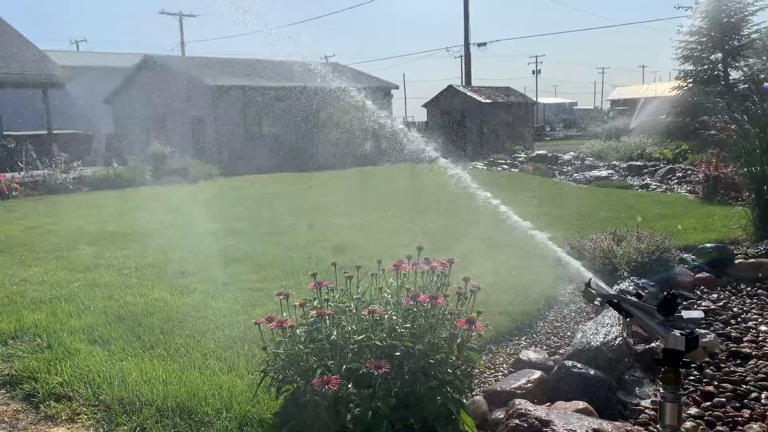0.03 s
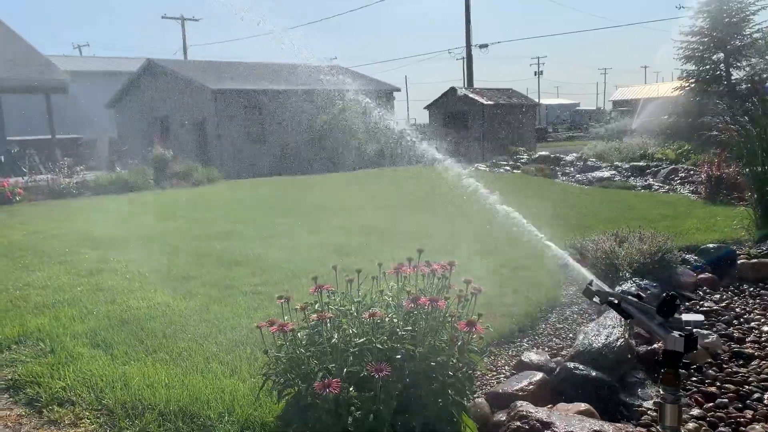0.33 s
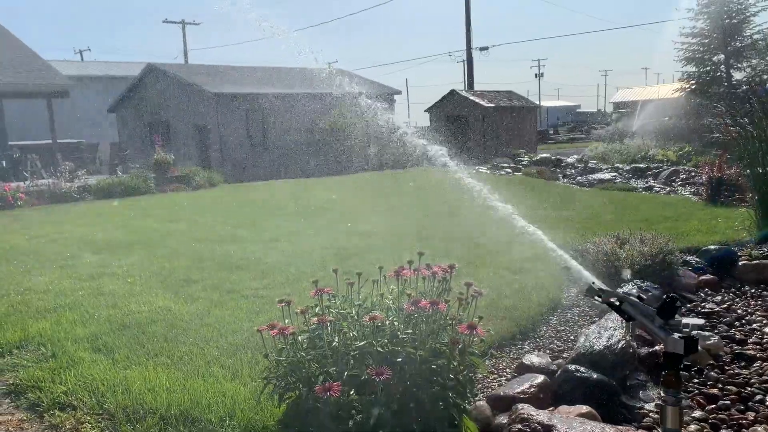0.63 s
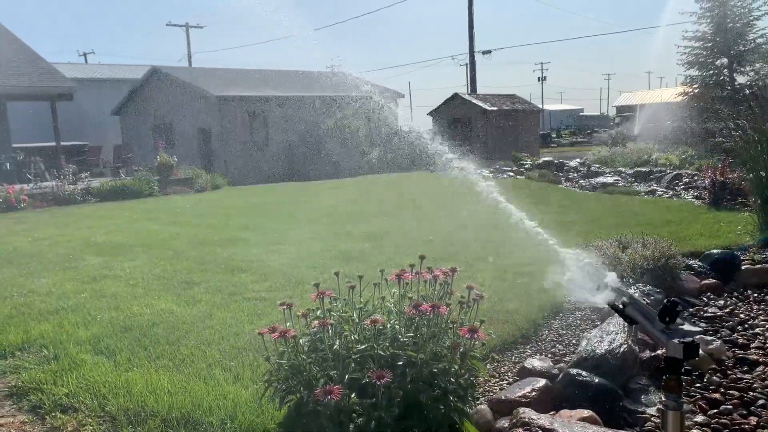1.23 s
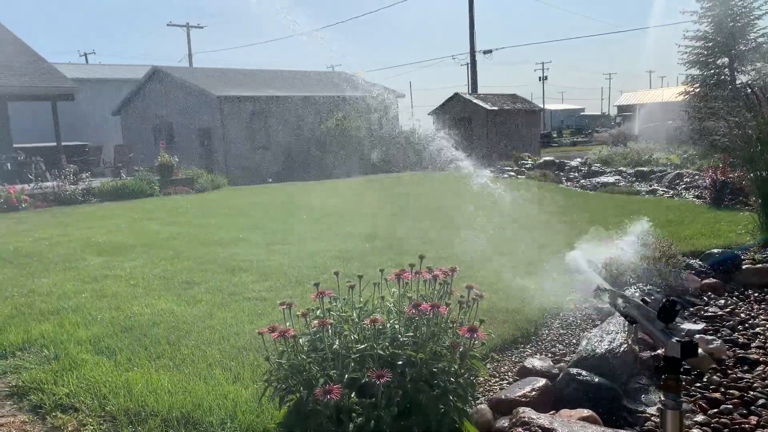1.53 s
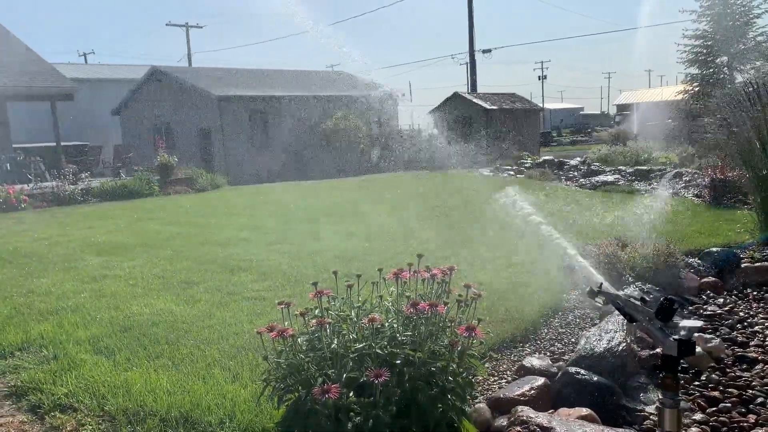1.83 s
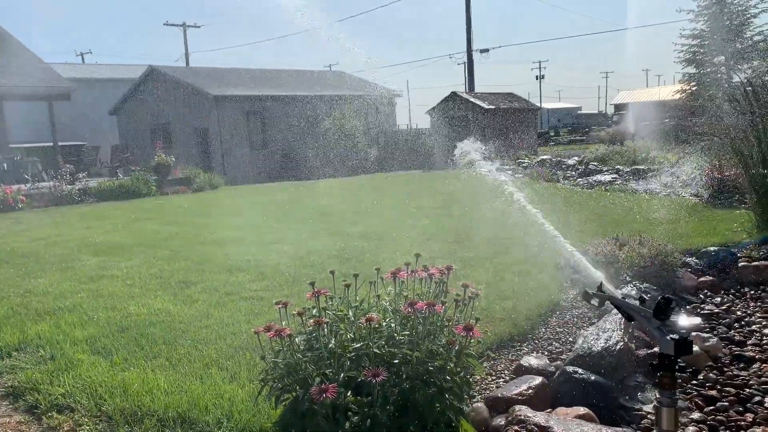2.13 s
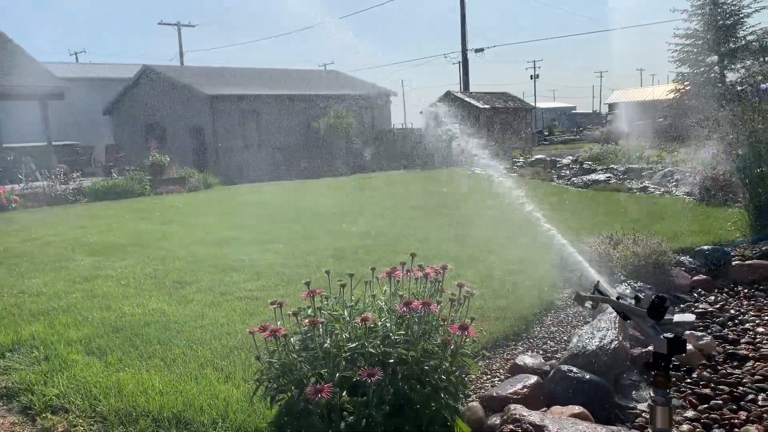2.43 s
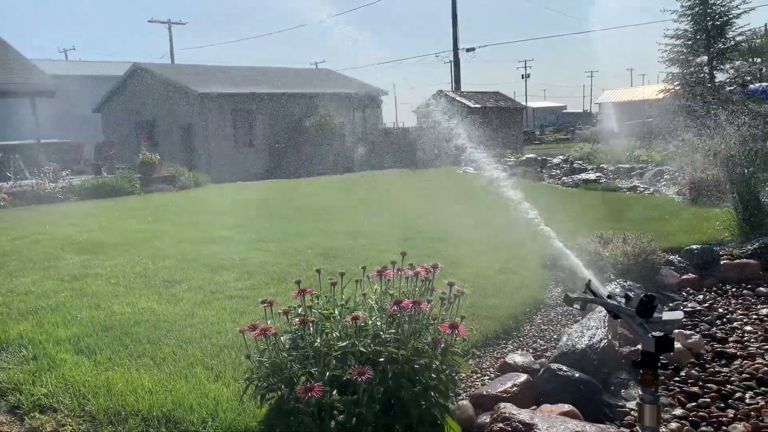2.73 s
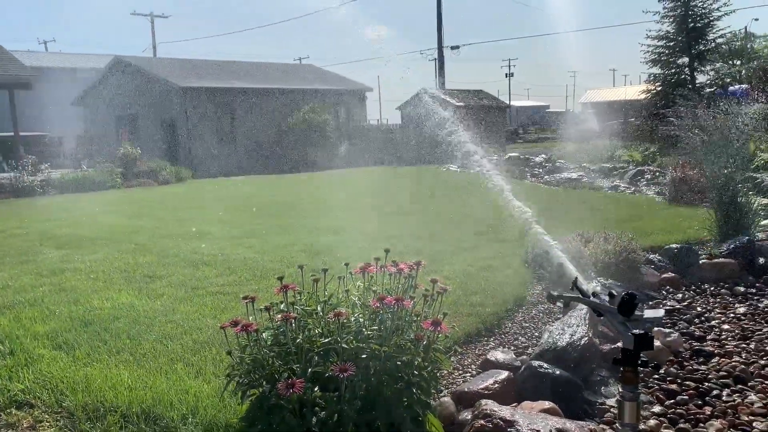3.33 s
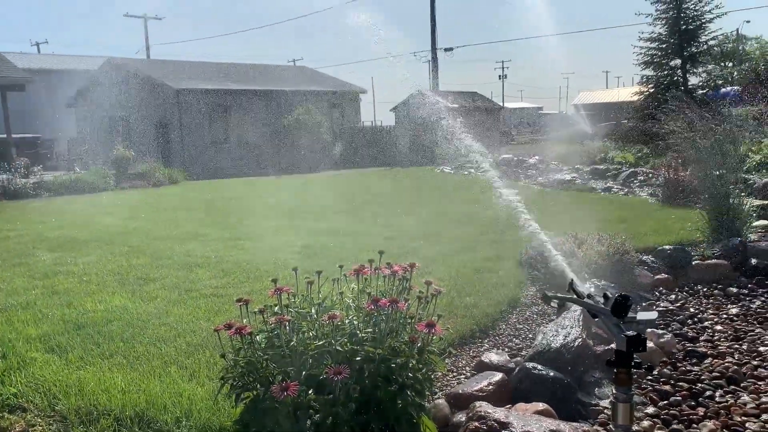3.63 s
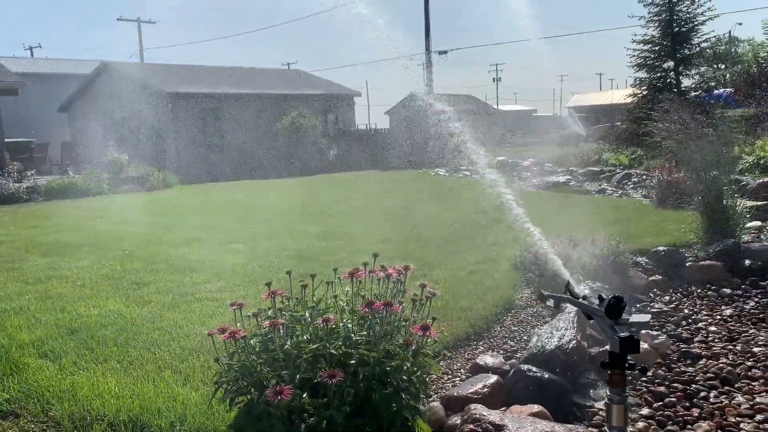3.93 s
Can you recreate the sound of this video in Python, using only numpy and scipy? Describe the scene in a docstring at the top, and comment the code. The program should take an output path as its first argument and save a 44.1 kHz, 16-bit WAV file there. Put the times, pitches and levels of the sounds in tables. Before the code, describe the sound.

An impact sprinkler ticks steadily over hissing water and a low pump drone.

```python
"""Impact sprinkler on a lawn

The jet hisses steadily and a sprung arm strikes into it 3.6 times a second, each stroke a ringing knock
and a burst of spray. Stray drops snap, plop and splatter on the stones close by. A pump engine thuds in
the background, and a little wind rumbles on the two closely spaced microphone ports."""
import sys
import numpy as np
from scipy.fft import rfft, irfft, next_fast_len
from scipy.io import wavfile
from scipy.ndimage import map_coordinates

SR = 44100
rng = np.random.default_rng(int(sys.argv[2]) if len(sys.argv) > 2 else 0)


def file_out(sig):
    """Save sig as 16-bit WAV at sys.argv[1]."""
    # one column per channel
    cols = np.atleast_2d(sig).T
    # limit, then scale
    lim = np.clip(cols, -1, 1)
    pcm = np.round(lim * 32767).astype(np.int16)
    wavfile.write(sys.argv[1], SR, pcm)


N = 176400

# strokes of the arm: t/s, knock level/dB, spray level/dB
STROKES = [(0.1868, -20.5, -22), (0.4685, -19.5, -26.5), (0.7501, -19.5, -23), (1.0321, -20.5, -21),
           (1.3117, -19.5, -23), (1.5915, -20, -23.5), (1.8722, -20, -22.5), (2.1526, -21.8, -21),
           (2.4333, -20.1, -21.5), (2.7126, -20, -23.5), (2.9933, -20, -21.5), (3.2726, -19.5, -22),
           (3.5512, -19.5, -21.5), (3.8303, -20.5, -22.5)]


def knock():
    """Modal ringing: the arm strikes the head twice per stroke, exciting damped sinusoids."""
    # modes of the head: f/Hz, level/dB, T60/s
    head_modes = [(664, -11, 0.088), (845, -13, 0.12), (1329, -3, 0.055), (1575, 2.5, 0.048),
                  (1944, 1.5, 0.034), (2397, 1, 0.038), (2824, -1.5, 0.021), (3500, -4, 0.03),
                  (3630, 1.5, 0.015), (3990, -1, 0.017), (4360, -13, 0.0099), (4940, -4, 0.02)]
    hz, level, t60 = np.transpose(head_modes)[:, :, None]
    lead_s, detune = 0.000986, 0.004
    hits = [(0, -1.5, 1), (0.002794, -12, 2)]  # delay/s, level/dB, scatter/dB
    sign = (-1) ** np.arange(len(hz))[:, None]
    out, t = np.zeros(N + SR), np.arange(SR // 6) / SR
    for at, db, _ in STROKES:
        for delay, hit_db, scatter_db in hits:
            decay = amp(level + scatter_db * rng.standard_normal(hz.shape) - 60 * t / t60)
            detuned_hz = hz * (1 + detune * rng.standard_normal(hz.shape))
            modes = sign * decay * np.sin(2 * np.pi * detuned_hz * t)
            start = int((at - lead_s + delay) * SR)
            out[start:start + len(t)] += amp(db + hit_db) * modes.sum(0)
    return out[:N]


def spray():
    """Impact noise: the arm cuts into the jet, a hard slap inside a ragged burst of spray."""
    # spectrum of water hitting the arm: f/Hz, level/dB
    slap_spectrum = [(200, 1), (500, -14), (1000, -1), (1500, -13), (4000, 2), (6500, -9.5), (10000, -17),
                     (16000, -5.5)]
    # spectrum of the deflected sheet of water: f/Hz, level/dB
    sheet_spectrum = [(400, -10), (1500, -3.5), (2800, -1), (4500, 1), (6500, -3.5), (8500, -0.5),
                      (12000, -3.5), (15500, -3.5)]
    at, knock_db, spray_db = np.transpose(STROKES)
    slap = bursts(at - 0.000986, knock_db + 2, rise=0.004, hold=0, t60=0.019)
    sheet = bursts(at - 0.0038, spray_db + 2.5, rise=0.023, hold=0.012, t60=0.067)
    return (slap * noise(slap_spectrum) + sheet * noise(sheet_spectrum)) * amp(0.67 * wobble(900))


def jet():
    """Jet break-up: the stream's hiss flutters, and it swells a little between strokes."""
    # spectrum of the hiss: f/Hz, level/dB
    hiss_spectrum = [(150, -2), (380, -10.5), (480, 4), (650, 2), (850, -1), (1100, 1), (1220, 0.5),
                     (1450, 2.5), (1750, -8.5), (1950, 1), (2200, -8.5), (2450, -0.5), (3300, -7),
                     (4500, -1), (6400, -4.5), (8500, -2.5), (11500, -2), (14500, 0.5)]
    delay_s, width_s = 0.125, 0.045
    swell = sum(np.exp(-((clock() - at - delay_s) / width_s) ** 2) for at, _, _ in STROKES)
    return noise(hiss_spectrum) * amp(-33.5 + 1.3 * swell + 0.4 * wobble(250) + 1.27 * wobble(20))


def stones(x):
    """Early reflection: the stones around the sprinkler add two echoes, forming a comb filter."""
    # reflections: delay/s, relative gain
    echoes = [(.0029, 0.16), (.0044, 0.073)]
    comb = lambda hz: 1 + sum(gain * np.exp(-2j * np.pi * hz * delay) for delay, gain in echoes)
    return filtered(x, comb) / np.sqrt(1 + sum(gain ** 2 for _, gain in echoes))


def drops():
    """Drop impact: a broadband snap on stone, then a splash of droplets; small drops patter at random."""
    # near drops: t/s, level/dB, low band relative to high band/dB
    near_drops = [(.098, -14.5, -14), (.2951, -18.5, -17), (.3768, -22.5, -12), (.4575, -13.5, -22),
                  (.5084, -25.5, -3), (.6594, -18.5, 0.5), (.6895, -23, -5), (.9472, -13, -29),
                  (.9786, -21, -9), (1.082, -23.5, -1.5), (1.1653, -19, -9), (1.1778, -23.5, -5),
                  (1.2415, -19.5, -7), (1.4413, -26.5, -0.5), (1.6966, -13.5, -7.5), (2.4559, -13, -26),
                  (2.504, -13, -8.5), (2.6452, -22, -5.5), (2.6992, -15, -10.5), (2.909, -18, -10),
                  (3.006, -14, -9), (3.0226, -15.5, -5), (3.0931, -24, -4), (3.3806, -19, -11),
                  (3.3921, -20, -6), (3.491, -14, -22), (3.6661, -23.5, 3.5), (3.6785, -24, -0.5)]
    # high band of an impact: f/Hz, level/dB
    high_band = [(1000, -8), (6000, -14), (8500, -3), (12000, -0.5), (16000, 2)]
    # low band of an impact: f/Hz, level/dB
    low_band = [(500, -34), (2000, -8), (4500, 2), (7500, 0.5), (11000, 0)]
    patter_per_s = 110
    when, size, tilt = rng.random((int(patter_per_s * N / SR), 3)).T
    patter_db = np.minimum(-35.5 - 2 * np.log(size), -29.5)
    patter = np.column_stack([when * N / SR, patter_db, -10 * tilt])
    at, db, low_db = np.vstack([near_drops, patter]).T

    def envelope(level):
        snap = bursts(at, level, rise=0.00033, hold=0.00027, t60=0.0018)
        splash = bursts(at + 0.001, level - 15, rise=0.012, hold=0, t60=0.089)
        return snap + splash * amp(3.6 * wobble(800))

    return envelope(db + 6) * noise(high_band) + envelope(db + low_db + 7) * noise(low_band)


def splatters():
    """Impact spread over time: loose sheets of spray land on the stones with a soft onset."""
    # landings of spray: t/s, level/dB
    landings = [(1.13, -31.5), (2.184, -25.5), (2.38, -33), (3.523, -33.5), (3.884, -36)]
    # spectrum of a splatter: f/Hz, level/dB
    spectrum = [(800, -16), (2000, -4), (4500, -1), (8500, -1.5), (15000, -11.5)]
    envelope = bursts(*np.transpose(landings), rise=0.035, hold=0.011, t60=0.068)
    return noise(spectrum) * envelope * amp(2 * wobble(700))


def plops():
    """Band-limited impact noise: a few heavier drops land with a dull plop near 2 kHz."""
    # landings of heavy drops: t/s, level/dB
    landings = [(0.051, -22.5), (.075, -23.5), (0.637, -33), (1.259, -29.5), (3.148, -30)]
    # spectrum of a plop: f/Hz, level/dB
    spectrum = [(500, -25), (1400, -2.5), (2100, 2.5), (3200, -7), (6000, -12)]
    return noise(spectrum) * bursts(*np.transpose(landings), rise=0.0098, hold=0.00064, t60=0.056)


def engine():
    """Source and filter: each firing thuds through the exhaust, over a drone and faint wavering tones."""
    # firing rate of the pump engine: t/s, f/Hz
    firing_rate = [(0, 25.24), (2.6, 25.24), (2.9, 25.16), (4, 25.16)]
    # response of the exhaust: f/Hz, level/dB
    exhaust = [(25, -18), (50, -18), (76, -7.5), (101, -5), (126, 1), (151, 3), (177, -1.5), (202, -2.5),
               (228, -3.5), (252, -14), (280, -21), (330, -21), (390, -43.5), (460, -30.5), (700, -35),
               (1500, -61)]
    # machine tones: f/Hz, level/dB, width/Hz
    whine = [(1092, -53.5, 5.03), (1305, -57, 25), (677, -62.5, 40)]
    # spectrum of the uneven drone: f/Hz, level/dB
    drone = [(30, -34), (70, -11.5), (130, 2), (210, -5.5), (300, -16), (450, -41.5)]
    jitter_s, scatter_db = 0.000096, 0.16
    t = clock()
    cycles = 0.66 + np.cumsum(np.interp(t, *np.transpose(firing_rate))) / SR
    firings = np.nonzero(np.diff(np.floor(cycles)))[0]
    timing, strength = rng.standard_normal((len(firings), 2)).T
    onsets = np.clip(firings + jitter_s * SR * timing, 0, N - 1).astype(int)
    pulses = np.bincount(onsets, amp(scatter_db * strength), N)
    thuds = unit(filtered(pulses, lambda hz: minimum_phase(exhaust, hz) * (hz > 10) * (hz < 2000)))
    tones = np.zeros(N)
    for hz, db, width in whine:
        phase = 2 * np.pi * hz * t
        tones += amp(db) * (wobble(width) * np.sin(phase) + wobble(width) * np.cos(phase))
    return amp(-29.5) * thuds + amp(-35) * noise(drone) + tones


def wind():
    """Turbulent pressure: light gusts and a few buffets rumble on the microphone, adding in power."""
    # course of the gusts: t/s, level/dB
    gust_levels = [(0, -31), (.4, -35), (.8, -36), (1.1, -49), (1.35, -47), (1.8, -45), (2.3, -40),
                   (2.9, -44), (3.3, -41.5), (3.7, -37), (4, -43)]
    # buffets of wind: t/s, level/dB
    buffet_peaks = [(.262, -29), (.395, -26), (1.115, -34), (2.2, -30), (3.43, -26), (3.595, -27)]
    # spectrum of the wind noise: f/Hz, level/dB
    rumble = [(15, -13), (40, 1.5), (70, -1.5), (120, -10.5), (200, -8), (350, -29), (1000, -53)]
    gusts = amp(np.interp(clock(), *np.transpose(gust_levels)))
    buffets = bursts(*np.transpose(buffet_peaks), rise=0.086, hold=0.004, t60=0.08)
    return noise(rumble) * np.hypot(gusts, buffets)


def noise(spectrum):
    """Partial coherence: independent mid and side noises mix into coloured stereo noise of rms 1."""
    # likeness of the two channels: f/Hz, coherence
    coherence = [(40, .96), (200, .98), (1200, .88), (2500, .75), (4500, .8), (6500, .45), (8500, .92),
                 (15000, .93)]

    def response(hz):
        angle = np.arccos(np.clip(along(coherence, hz), 0, 1)) / 2
        return amp(along(spectrum, hz)) * [np.cos(angle), np.sin(angle)]

    mid, side = filtered(rng.standard_normal((2, N)), response)
    return unit(np.array([mid + side, mid - side]))


def bursts(times, levels_db, rise, hold, t60):
    """Incoherent sum: envelopes that rise 60 dB, hold and decay add in power; times in seconds."""
    power = np.zeros(N)
    for at, db in zip(times, levels_db):
        i = np.arange(max(int((at - 0.04) * SR), 0), min(int((at + 0.12) * SR), N))
        t = i / SR - at
        power[i] += amp(db + 60 * np.minimum(t, 0) / rise - 60 * np.maximum(t - hold, 0) / t60) ** 2
    return np.sqrt(power)


def minimum_phase(spectrum, hz):
    """Causality: folding the cepstrum gives a response that starts sharply and rings out."""
    cepstrum = irfft(np.log(amp(along(spectrum, hz))))
    half = len(cepstrum) // 2
    fold = np.r_[1, np.full(half - 1, 2), 1, np.zeros(half - 1)]
    return np.exp(rfft(cepstrum * fold))


def filtered(x, response):
    """Linear filtering: the spectrum of x is multiplied by a frequency response."""
    size = next_fast_len(N + SR // 2)
    return irfft(rfft(x, size) * response(np.fft.rfftfreq(size, 1 / SR)), size)[..., :N]


def wobble(rate):
    """Random modulation: a smooth curve through rate Gaussian knots a second."""
    return map_coordinates(rng.standard_normal(int(N * rate / SR) + 4), [clock() * rate])


def along(points, hz):
    """Interpolation of (f/Hz, value) points on a logarithmic frequency axis."""
    f, values = np.transpose(points)
    return np.interp(np.log(hz + 1), np.log(f + 1), values)


def amp(db):
    """Amplitude ratio of a level in decibels."""
    return 10 ** (np.asarray(db) / 20)


def unit(x):
    """Normalisation to rms 1."""
    return x / np.sqrt(np.mean(x ** 2) + 1e-20)


def clock():
    """Time of each sample in seconds."""
    return np.arange(N) / SR


def scene():
    """Superposition: sprinkler, falling water, pump and wind add as pressures."""
    return knock() + stones(spray() + jet()) + drops() + splatters() + plops() + engine() + wind()


def record(dry):
    """Spaced receivers: two band-limited ports differ in phase and level; the sound opens on silence."""
    # phase between the ports: f/Hz, lead of left/rad
    port_phase = [(20, 0), (700, -.3), (1200, -.7), (1500, -1.5), (2700, -1.8), (3300, -1.1), (3900, -.1),
                  (4500, 0), (5300, -1.1), (6100, -1.2), (6700, .8), (8100, -.3), (10000, -3.4),
                  (11800, -6.6), (13500, -9.4), (15500, -12.6)]
    # balance of the ports: f/Hz, left minus right level/dB
    port_balance = [(100, 0.8), (1000, .5), (2200, .6), (3500, -0.8), (5500, -3), (7000, 0), (15000, 0)]
    start_s, top_hz = 0.036, 15850
    side = np.array([[0.5], [-0.5]])
    ports = lambda hz: amp(side * along(port_balance, hz)) * np.exp(1j * side * along(port_phase, hz))
    return filtered(dry * (clock() > start_s), lambda hz: ports(hz) * (hz < top_hz))


dry = scene()
out = record(dry)
file_out(out)
```